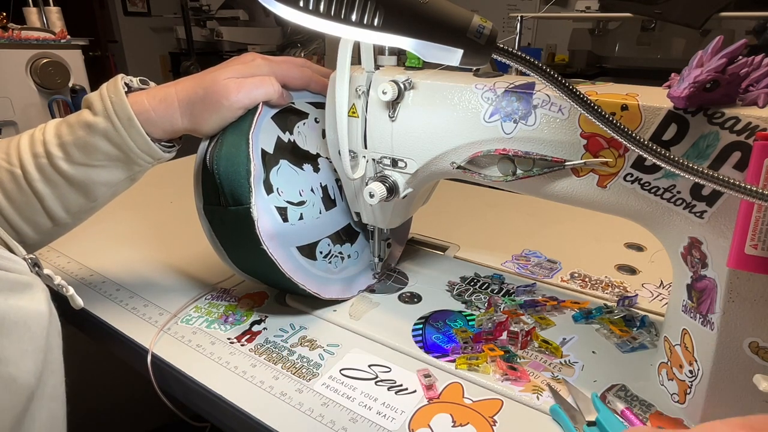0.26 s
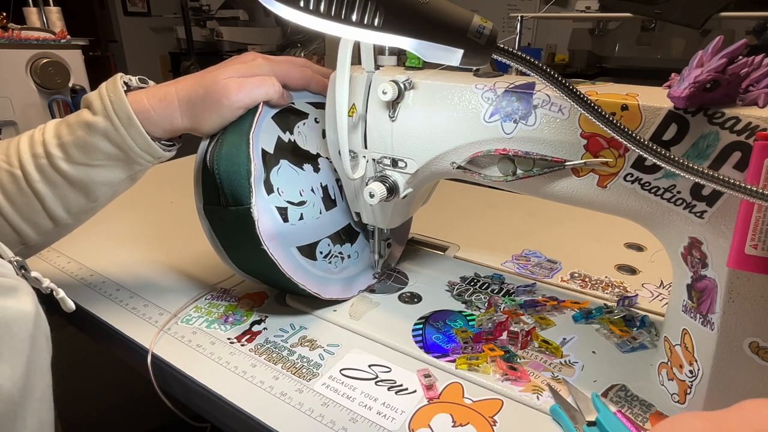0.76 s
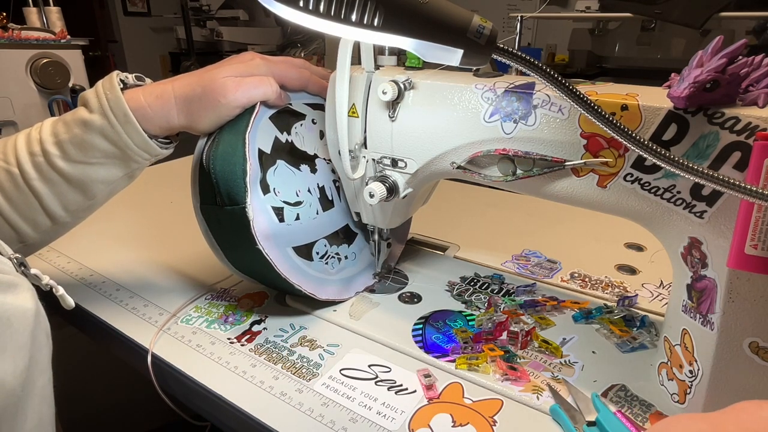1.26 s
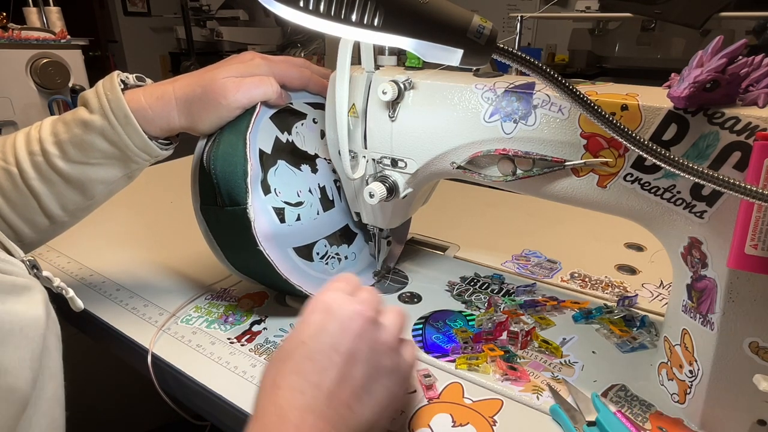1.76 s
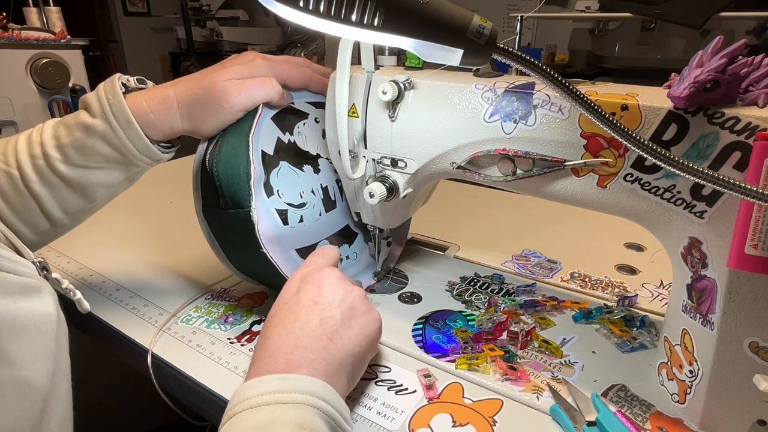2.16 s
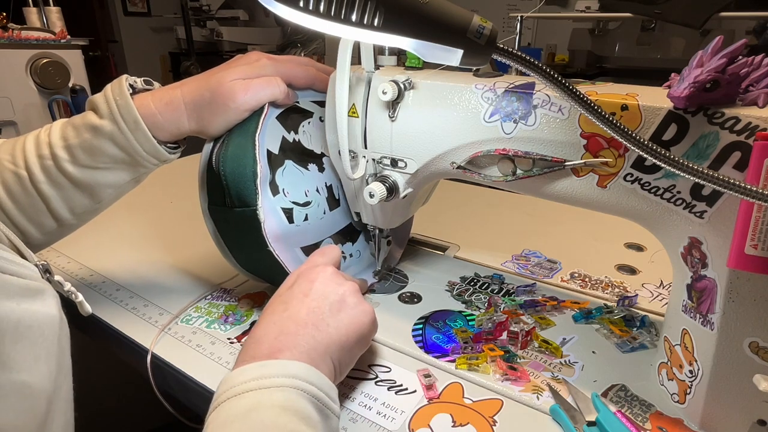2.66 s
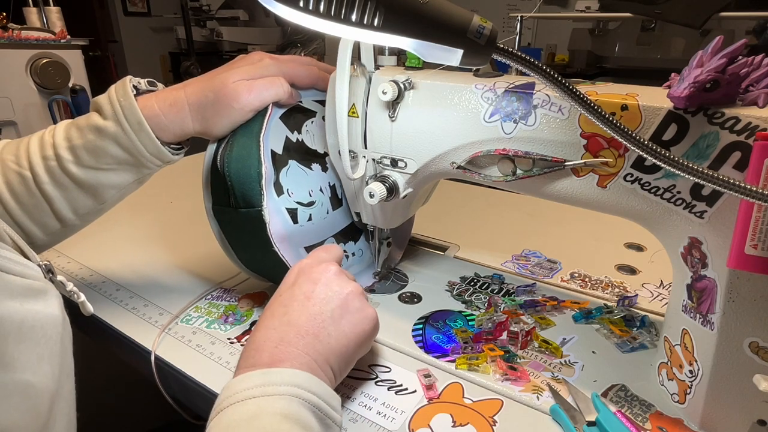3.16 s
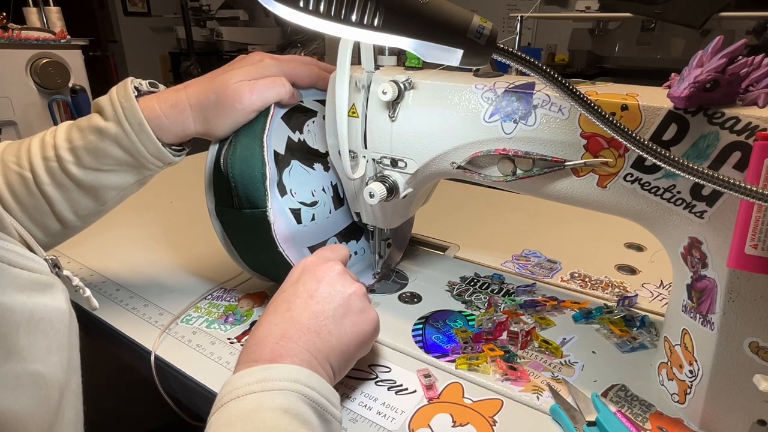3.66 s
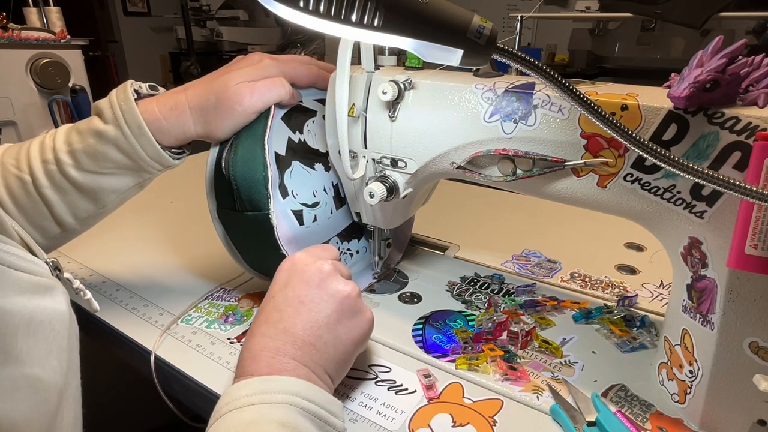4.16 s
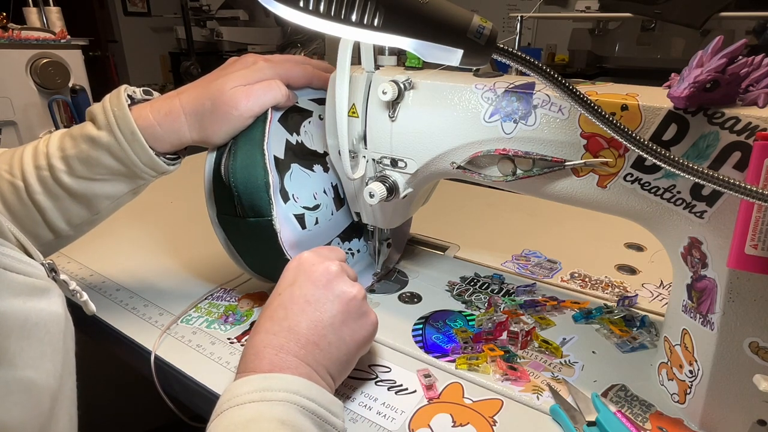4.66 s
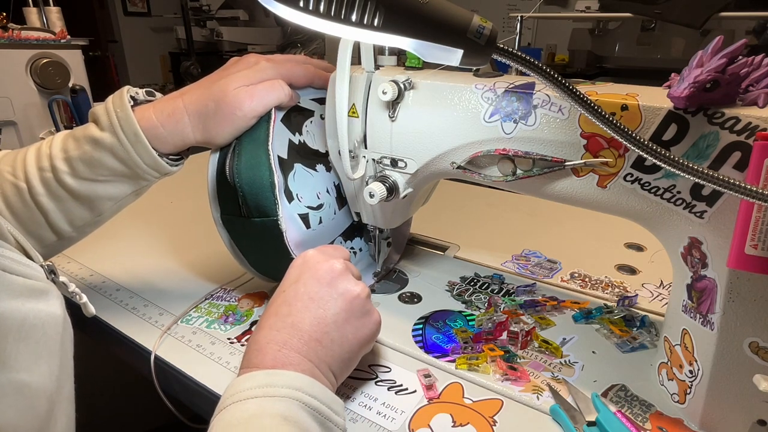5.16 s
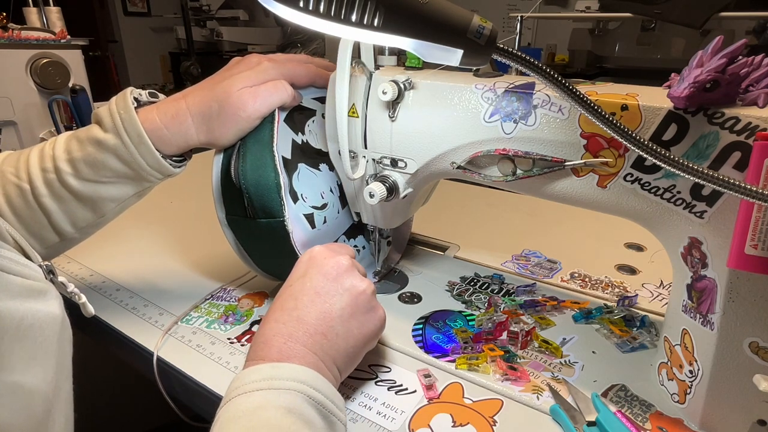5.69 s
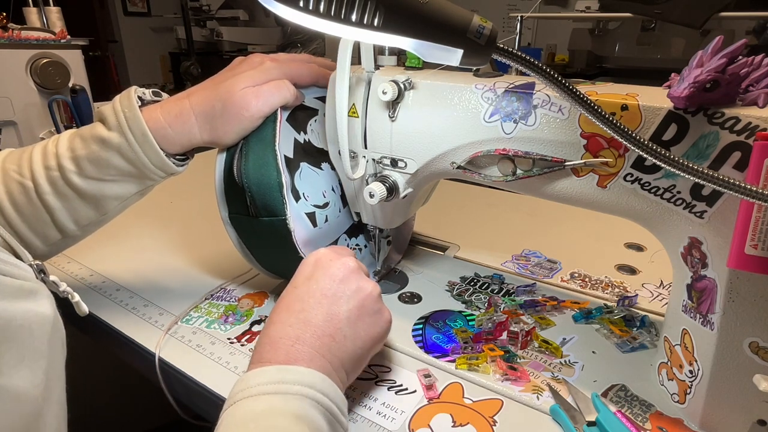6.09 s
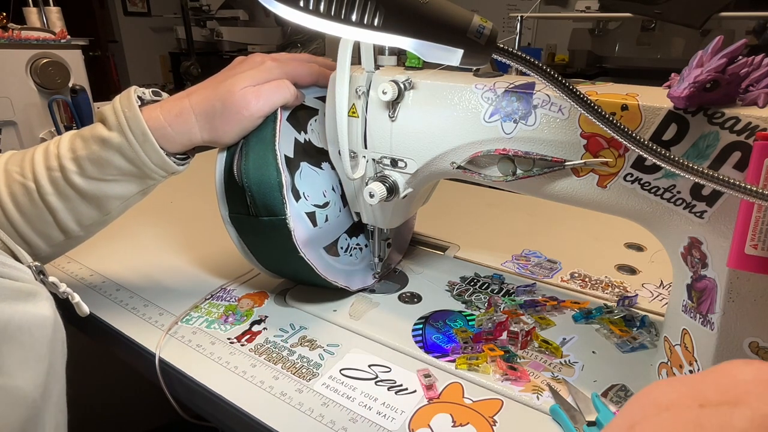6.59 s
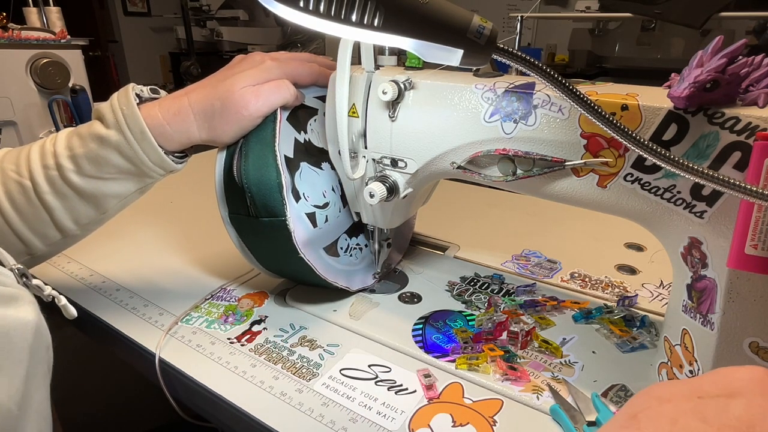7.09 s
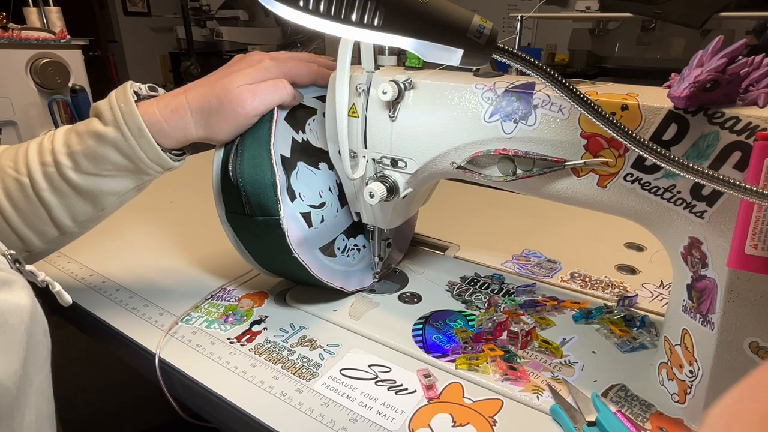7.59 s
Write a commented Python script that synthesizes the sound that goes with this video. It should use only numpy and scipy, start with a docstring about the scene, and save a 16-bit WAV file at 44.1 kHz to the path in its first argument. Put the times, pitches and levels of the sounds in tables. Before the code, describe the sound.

An industrial sewing machine works through a stiff panel, heard very near with short indoor reflections. Hard metallic clicks come first, then the gears start whirring with belt chirps. Thirteen heavy, evenly spaced needle clacks follow, with table knocks, ticking linkage and dry squeaks. The motor runs down, fabric shifts softly, the machine restarts for one stitch and ends in a sharp snap, leaving faint hiss.

```python
"""In a small workroom, close by, an industrial sewing machine stitches slowly through a stiff panel.
Levers clatter as steel clicks over a ringing bed, then gear noise, a hum and belt chirps start the motor.
A little over twice a second comes a clack, a sweeping knock, a dying rasp of thread noise and feed thuds,
with small squeaks from sliding tones. The machine stops, makes one more stitch and stops again
with a sharp snap of one bright tone; a soft hiss of coloured noise lingers."""
import sys
import numpy as np
from scipy import signal
from scipy.fft import rfft, irfft, next_fast_len
from scipy.io import wavfile
from scipy.ndimage import map_coordinates

SR = 44100
rng = np.random.default_rng(int(sys.argv[2]) if len(sys.argv) > 2 else 0)


def store_wav(level_fs):
    """Save 16-bit WAV to argv[1]."""
    pcm = np.round(np.clip(np.atleast_2d(level_fs), -1, 1) * 32767)
    wavfile.write(sys.argv[1], SR, pcm.T.astype(np.int16))


N = 345744
TIME = np.arange(N) / SR
# In all tables and settings, t60 is the time to fade by 60 dB; dB levels are before later mixing gains.


def amp(db):
    """Turn decibels into a gain."""
    return 10 ** (np.asarray(db) / 20)


def unit(x):
    """Scale to an rms (average strength) of 1."""
    return x / np.sqrt(np.mean(x ** 2) + 1e-20)


def along(points, hz):
    """Read a value between (Hz, value) points on a logarithmic pitch axis."""
    point_hz, value = np.transpose(points)
    return np.interp(np.log(hz + 1), np.log(point_hz + 1), value)


def wobble(rate):
    """Draw a smooth random curve through `rate` random points a second."""
    points = rng.standard_normal(int(N * rate / SR) + 4)
    return map_coordinates(points, [TIME * rate], order=2)


def filtered(x, response):
    """Change strength and phase at each frequency by a complex response."""
    size = next_fast_len(N + SR // 2)
    hz = np.fft.rfftfreq(size, 1 / SR)
    return irfft(rfft(x, size) * response(hz), size)[..., :N]


def noise(spectrum):
    """Make noise of rms 1 with the given colour, falling off below its lowest point."""
    low_hz = spectrum[0][0] / 2

    def colour(hz):
        return amp(along(spectrum, hz)) * hz ** 2 / (hz ** 2 + low_hz ** 2)

    return unit(filtered(rng.standard_normal(N), colour))


def resonant_noise(modes):
    """Make noise of rms 1 through resonances given as (pitch_hz, width_hz, level_db)."""
    def body(hz):
        total = 0
        for k, (pitch, width, db) in enumerate(modes):
            resonance = 1j * hz * width / (pitch * pitch - hz * hz + 1j * hz * width)
            total = total + (-1) ** k * amp(db) * resonance  # neighbours have opposite signs
        return total

    return unit(filtered(rng.standard_normal(N), body))


def add(track, s, sound):
    """Mix a sound into a track at time s."""
    start = max(round(s * SR), 0)
    track[start:start + len(sound)] += sound[:max(N - start, 0)]


def bursts(rows, attack, t60):
    """Make a loudness curve that jumps at each (start_s, level_db) row and dies away."""
    t, out = TIME[:SR], np.zeros(N)
    shape = (1 - np.exp(-t / attack)) * amp(-60 * t / t60)
    for s, db in rows:
        add(out, s, amp(db) * shape / shape.max())
    return out


def rings(rows, modes, attack, scatter_db):
    """At each (start_s, level_db) row ring the (pitch_hz, level_db, t60_s) modes at new strengths."""
    t, out = TIME[:SR], np.zeros(N)
    onset = 1 - np.exp(-(t / attack) ** 2)
    for s, db in rows:
        ring = np.zeros(len(t))
        for hz, level, t60 in modes:
            fade = amp(level + scatter_db * rng.normal() - 60 * t / t60)
            ring += fade * np.sin(2 * np.pi * (hz * t + rng.random()))
        add(out, s, amp(db) * ring * onset)
    return out


def chatter(rate, t60, spread_db):
    """Make a loudness curve of rms 1 from many tiny contacts of uneven size, `rate` a second."""
    sizes = amp(spread_db * np.minimum(rng.exponential(size=N), np.pi))
    contacts = (rng.random(N) < rate / SR) * sizes
    return unit(signal.fftconvolve(contacts, amp(-60 * TIME[:SR // 10] / t60))[:N])


def spacious(layer, angle):
    """Mix one part shared by both sides with a separate part on each; a larger angle is more diffuse."""
    return np.cos(angle) * layer() + np.sin(angle) * np.array([layer(), layer()])


# colour of a knock on the table: pitch_hz, level_db
KNOCK_COLOUR = [(60, -17), (200, -14), (340, 4.5), (480, -9.5), (900, -17), (1700, -12.5), (3000, -53),
                (8000, -52.5)]


def knocks(rows, lag, spread, knee_hz):
    """Send bending waves through the table top: treble outruns bass, so each knock sweeps downwards."""
    pushes = np.zeros(N)
    for s, db in rows:
        add(pushes, s + lag, amp([db]))

    def bending(hz):
        # the deepest bass arrives `spread` seconds late, higher pitches sooner
        turns = spread * knee_hz * np.log(1 + hz / knee_hz)
        return amp(along(KNOCK_COLOUR, hz)) * np.exp(-2j * np.pi * turns)

    return filtered(pushes, bending)


# times when the motor is driven: start_s, stop_s, level_db
MOTOR_RUNS = [(0.681, 6.258, -2.5), (6.974, 7.44, -3.5)]


def drive(t60):
    """Follow how strongly the motor turns things: quick to start, running down after each stop."""
    strength = np.zeros(N)
    for on, off, db in MOTOR_RUNS:
        rise = np.clip((TIME - on) / 0.0065, 0, 1)
        strength += amp(db) * rise * amp(-60 * np.maximum(TIME - off, 0) / t60)
    return strength


# needle strokes: start_s, thread_rasp_db, knock_db, knock_delay_s, following_feed_weight_db
STITCHES = [(0.864, -40, -36.5, 0.035, -4), (1.277, -49.5, -35, 0.046, 2.5),
            (1.7031, -41.5, -36.5, 0.012, 3.5), (2.1291, -41.5, -33.5, 0.015, 0.5),
            (2.5631, -45, -47, 0.011, -0.5), (2.9909, -50, -31.5, .012, 0.5),
            (3.4241, -48, -34, 0.0091, 2.5), (3.8527, -45.5, -35.5, 0.014, 3),
            (4.2772, -44, -44, 0.0095, 0), (4.708, -47.5, -34.5, 0.011, 0), (5.139, -46, -35.5, 0.012, 1),
            (5.5658, -44, -32, 0.0098, 2), (5.9986, -47, -46.5, 0.011, 3),
            (7.1554, -41.5, -39.5, 0.052, -2.5)]
CYCLE_SCATTER_DB, CYCLE_SCATTER_S = 1.5, 0.002  # random differences between stitches


def each_stitch(cycle, weighted=False):
    """Repeat (delay_s, level_db) contacts at every stroke while driven; weighted adds the feed's weight."""
    rows = []
    for stroke, *_, feed_db in STITCHES:
        for delay, db in cycle:
            s = stroke + delay + CYCLE_SCATTER_S * rng.normal()
            level = db + weighted * feed_db + CYCLE_SCATTER_DB * rng.normal()
            if any(on < s < off for on, off, _ in MOTOR_RUNS):
                rows.append((s, level))
    return rows


# colour of the quiet room: pitch_hz, level_db (per Hz)
QUIET_COLOUR = [(18, -30), (30, 0), (102, 0), (597, -18), (1520, -13), (5580, -32), (8040, -37),
                (9390, -49), (15000, -34)]
# colour of the lingering hiss: pitch_hz, level_db (per Hz)
HISS_COLOUR = [(200, 2), (500, -10), (1000, -10.5), (2000, -3.5), (3000, -9), (5000, -10), (8000, -12.5),
               (12000, -26.5), (15000, -25)]
# loudness of the lingering hiss: time_s, level_db
HISS_LEVEL = [(7.46, -100), (7.52, -50.5), (7.65, -50.5), (7.84, -51)]


def air():
    """Soft coloured noise fills the quiet room, with a hiss after the last stop."""
    hiss = amp(np.interp(TIME, *np.transpose(HISS_LEVEL)))
    still = amp(-73) * spacious(lambda: noise(QUIET_COLOUR), angle=.4)
    return still + hiss * spacious(lambda: noise(HISS_COLOUR), angle=.6)


# hard clicks of levers and presser foot: start_s, click_db, blow_to_bed_db
LEVER_CLICKS = [(0.0272, -17, -51.5), (0.0389, -15, -42), (0.0945, -12.5, -28.5), (0.119, -27.5, -38.5),
                (0.1361, -21.5, -38.5), (0.147, -36, -43.5), (0.169, -37.5, -45.5), (0.259, -46, -80.5),
                (0.282, -37, -68), (0.387, -41.5, -60.5), (0.5411, -31.5, -63), (6.706, -34, -60.5),
                (6.9768, -49.5, -42), (7.4112, -32.5, -66), (7.4847, -21, -45.5)]
# ringing modes of the machine bed: pitch_hz, level_db, t60_s
BED_MODES = [(256.5, -10.5, 0.4), (371, -8.5, .13), (436, 0, .13), (476, -3, 0.13), (551, 0, 0.11),
             (631, -5, 0.13), (885, -7, .11), (1204, -13, .12), (1790, -10.5, .08), (2220, -10, 0.071)]
# ringing modes of the table: pitch_hz, level_db, t60_s
TABLE_MODES = [(48.5, 4.5, 0.54), (78.2, 0, 0.66), (62.9, -7.5, 0.5), (41.5, -12.5, .5), (119, -5.5, 0.35),
               (165.5, -7, .25)]
# colour of steel on steel: pitch_hz, level_db (per Hz)
STEEL_COLOUR = [(150, -14.5), (400, -7), (1100, -7.5), (1900, 0.5), (2900, -10.5), (4600, 1), (5600, 0),
                (6800, -2.5), (8500, 0), (12000, -9.5), (15000, -17)]
# colour of loose parts on the bed: pitch_hz, level_db (per Hz)
LOOSE_COLOUR = [(150, 1.5), (450, 4.5), (900, 0), (1900, -5), (2800, -14), (6000, -15.5), (9000, -31),
                (15000, -34.5)]
# the catch's lever lands on its stop: start_s, thud_db, jolt_to_table_db
LANDINGS = [(0.602, -35.5, -50), (1.5168, -31.5, -44.5), (6.778, -39, -51.5), (7.486, -33.5, -40)]
BED_LAG_S = 0.00087  # the bed answers just after the click
BED_RINGING_DB = -36.5  # loose parts are already rattling at the outset
# starts and stops rock the table a moment later
START_JOLT_DB, STOP_JOLT_DB, JOLT_LAG_S = -47.5, -47.5, 0.0266


def levers():
    """Steel clicks knock and ring the bed and rattle its loose parts; starts, stops, landings rock the table."""
    hits = [(s, db) for s, db, _ in LEVER_CLICKS]
    blows = [(s + BED_LAG_S, db) for s, _, db in LEVER_CLICKS]
    jolts = [(s, db) for s, _, db in LANDINGS]
    for on, off, _ in MOTOR_RUNS:
        jolts += [(on + JOLT_LAG_S, START_JOLT_DB), (off + JOLT_LAG_S, STOP_JOLT_DB)]
    contact = amp(-6.0) * bursts(hits, attack=.0004, t60=.022)
    afterglow = amp(-38.0) * bursts(hits, attack=0.0064, t60=0.22)
    clicks = (contact + afterglow) * noise(STEEL_COLOUR)
    bed = rings(blows, BED_MODES, attack=0.005, scatter_db=2.5)
    shaking = bursts([(0, BED_RINGING_DB)] + blows, attack=0.003, t60=0.16)
    rattle = amp(-4.5) * shaking * chatter(rate=210, t60=0.034, spread_db=2.5) * noise(LOOSE_COLOUR)
    body = amp(32.5) * knocks(blows, lag=0.001, spread=0.01386, knee_hz=600)
    rocking = rings(jolts, TABLE_MODES, attack=0.026, scatter_db=2.5)
    return clicks + bed + body + rattle + rocking


# the panel is shifted by hand while the machine rests:
# loudest_s, length_of_rise_and_of_fall_s, rustle_db, low_rubbing_db
HANDLING = [(0.455, 0.34, -71, -76), (0.543, 0.052, -71, -51.5), (6.408, 0.13, -84.5, -63),
            (6.535, 0.065, -69.5, -82), (6.631, 0.075, -67, -81.5), (6.703, 0.054, -66.5, -61.5),
            (6.888, 0.28, -68, -64)]
# colour of the rustle: pitch_hz, level_db (per Hz)
RUSTLE_COLOUR = [(500, -8), (1000, 1.5), (1600, 2), (3000, -5), (6000, -22), (12000, -32)]
# colour of the low rubbing: pitch_hz, level_db (per Hz)
RUBBING_COLOUR = [(90, -4.5), (240, 2), (450, -9), (900, -27.5), (4000, -48)]
# knocks on the table: from the panel as it is guided, and near 1.05-1.44 s further feed knocks; start_s,
# level_db
TABLE_KNOCKS = [(1.052, -42), (1.252, -41), (1.44, -43), (1.99, -37), (2.474, -38), (4.488, -40.5),
                (5.945, -39.5), (6.083, -34.5)]


def panel():
    """The table knocks, mostly from the stiff panel and now and then from the feed; the panel rustles and rubs
    in soft swells of noise when shifted."""
    rustle, rubbing = np.zeros(N), np.zeros(N)
    for s, length, rustle_db, rubbing_db in HANDLING:
        swell = np.cos(np.pi * np.clip((TIME - s) / (2 * length), -.5, .5)) ** 4
        rustle += amp(rustle_db) * swell
        rubbing += amp(rubbing_db) * swell
    shifting = rustle * spacious(lambda: noise(RUSTLE_COLOUR), angle=1.0) + rubbing * noise(RUBBING_COLOUR)
    return shifting + amp(41.5) * knocks(TABLE_KNOCKS, lag=0.0024, spread=0.012, knee_hz=505)


# the catch snaps over and rebounds, one row for each contact: start_s, level_db, pitch_hz
SNAPS = [(0.591, -16.5, 2820), (0.595, -25.5, 2876), (1.506, -20, 2980), (1.5137, -35.5, 3170),
         (1.5192, -37, 3020), (1.5297, -37, 3010), (6.7654, -20, 2966), (7.4763, -11.5, 3010),
         (7.479, -28, 3160), (7.4994, -18.5, 3050), (7.5161, -24, 3070), (7.5273, -38, 3050)]
# colour of its crack, also used for the needle's press: pitch_hz, level_db (per Hz)
CRACK_COLOUR = [(200, 0.5), (500, 3), (1100, -4.5), (1900, 3.5), (3000, -1), (4500, 2), (6300, 1.5),
                (7200, 4.5), (8500, 1.5), (12000, -21.5), (15000, -32)]


def catch(rise=0.0016, t60=0.008):
    """A small stiff part snaps: a crack, a few cycles of one bright mode, a knock and its lever's thud."""
    t, chirps = TIME[:SR // 20], np.zeros(N)
    shape = (1 - np.exp(-(t / rise) ** 3)) * amp(-60 * t / t60)
    for s, db, hz in SNAPS:
        add(chirps, s, amp(db + 4) * shape / shape.max() * np.sin(2 * np.pi * hz * t))
    blows = [(s, db) for s, db, _ in SNAPS]
    crack = amp(-13) * bursts(blows, attack=0.00024, t60=0.016) * noise(CRACK_COLOUR)
    shiver = amp(-37) * bursts(blows, attack=0.0033, t60=0.17) * noise(CRACK_COLOUR)
    landings = [(s, db) for s, db, _ in LANDINGS]
    lever_modes = [(332, 0.5, 0.068), (238.6, -6.5, 0.11), (432, -11, 0.17), (171, -25.5, 0.3)]
    thud = rings(landings, lever_modes, attack=0.0034, scatter_db=2.5)
    body_noise = resonant_noise([(1520, 890, -5.5), (2450, 480, 3.5)])
    body = amp(-24.0) * bursts(blows, attack=0.00094, t60=0.023) * body_noise
    knock = amp(21) * knocks(blows, lag=0.0011, spread=0.02, knee_hz=471)
    return chirps + crack + body + shiver + thud + knock


# belt and pulley chirps: point_of_turn (0 to 1), pitch_hz, level_db
BELT_CHIRPS = [(.22, 1450, -60), (.31, 3760, -48), (.5, 1715, -55.5), (.5, 4810, -62)]
CHIRP_STRAY = .016  # how far a chirp's pitch strays (share of the pitch)
TURN_TICK_AT, TURN_TICK_DB = .3, -58.5  # point of the turn (0 to 1), level


def belt(turns):
    """At fixed points of every turn the belt and pulley chirp with straying pitch, and the belt ticks."""
    chirps = np.zeros(N)
    for point, hz, db in BELT_CHIRPS:
        pulse = ((1 + np.cos(2 * np.pi * (turns - point))) / 2) ** 7 * amp(2.7 * wobble(40))
        pitch_hz = hz * (1 + CHIRP_STRAY * wobble(70))
        tone = np.sin(2 * np.pi * np.cumsum(pitch_hz) / SR)
        chirps += amp(db) * pulse * (tone + .4 * resonant_noise([(hz, hz / 9, 0)]))
    since_tick = (turns - TURN_TICK_AT) % 1
    tick = unit(np.exp(-2 * np.pi * since_tick) * amp(3 * wobble(40)))
    tick_noise = resonant_noise([(720, 370, 0.0), (1645, 350, -6.5), (4120, 370, -6.5)])
    return chirps + amp(TURN_TICK_DB) * tick * tick_noise


# speed of the motor: time_s, turns_per_s
MOTOR_SPEED = [(.68, 39.35), (1.5, 39.4), (2.5, 39.1), (3.4, 39.12), (4.1, 39.65), (5, 39.22),
               (6.25, 39.15), (6.6, 37.6), (7, 39.5), (7.4, 39.8)]
# colour of the gear rumble: pitch_hz, level_db (per Hz)
GEAR_COLOUR = [(30, -9.5), (110, -2.5), (220, 8.5), (420, 4), (680, 3.5), (1100, -6), (1650, -11),
               (2600, -21), (3300, -5.5), (4400, -14), (6000, -23), (9000, -24.5), (15000, -41)]
# resonances of the casting, stirred by the running gear: pitch_hz, width_hz, level_db
CASTING_MODES = [(257, 55, 0), (383, 53, -3), (420.4, 37, 0), (590, 33, 4.5), (803.7, 27, 4)]
# colour of loose play: pitch_hz, level_db (per Hz)
PLAY_COLOUR = [(300, -4), (800, -2), (1600, 0.5), (2550, 3.5), (3500, 1), (4800, 4.5), (7000, -11.5),
               (14000, -23)]
GEAR_DB, CASTING_DB, PLAY_DB, HUM_DB, DRONE_DB = -50.5, -52, -57.5, -55.5, -57
HUM_RUNDOWN_S = 0.97  # t60: the hum outlasts the gears


def motor():
    """Gears rumble, loose parts play, a hum wavers at twice the turning rate, and the belt ticks fast."""
    turns = np.cumsum(np.interp(TIME, *np.transpose(MOTOR_SPEED))) / SR
    # every stitch briefly makes the gears louder
    load = 1 + 0.076 * bursts([(s, 0) for s, *_ in STITCHES], attack=0.011, t60=0.14)
    gear = amp(GEAR_DB) * spacious(lambda: noise(GEAR_COLOUR), angle=0.21) * amp(1.4 * wobble(90))
    casting = amp(CASTING_DB) * spacious(lambda: resonant_noise(CASTING_MODES), angle=0.29)
    loose = chatter(rate=90, t60=.016, spread_db=3.2)
    play = amp(PLAY_DB) * loose * noise(PLAY_COLOUR)
    waver = np.abs(1 + .4 * wobble(9))
    hum = amp(HUM_DB) * waver * np.sin(4 * np.pi * turns + 0.8 * wobble(11))
    drone = amp(DRONE_DB) * resonant_noise([(79.2, 10.2, 9.0), (49.0, 7.4, -3.0)])
    running = drive(t60=0.28) * (load * gear + play + belt(turns))
    return running + drive(t60=0.19) * load * casting + drive(t60=HUM_RUNDOWN_S) * (hum + drone)


# feed thuds in every stitch: after_stroke_s, level_db
FEED_CYCLE = [(-.015, -41.5), (.186, -42.5), (.215, -38.5)]
# ticks of linkage and thread in every stitch: after_stroke_s, level_db
TICK_CYCLE = [(.031, -39.5), (.079, -36.5), (.108, -39), (.135, -45.5), (.209, -39.5), (.254, -39.5),
              (.365, -46)]
# loose links and thread clack between strokes: start_s, level_db
LOOSE_CLACKS = [(1.564, -37), (1.575, -40), (1.588, -44), (1.599, -43), (2.327, -37), (2.851, -32.5),
                (3.5984, -40), (3.6386, -43), (4.0547, -47), (4.5575, -33.5), (4.9192, -47), (6.0876, -50),
                (7.361, -40)]
# squeaks of a dry steel joint that slips now and then: start_s, level_db
SQUEAKS = [(0.7028, -43), (0.9697, -43.5), (1.4381, -42.5), (1.8173, -38.5), (2.2374, -41.5), (2.6015, -43),
           (2.6628, -46), (3.2094, -41), (3.5818, -40), (3.6411, -41), (4.4104, -41.5), (4.8464, -43.5),
           (5.2759, -45.5), (5.7848, -41.5), (6.2272, -40), (6.993, -41.5), (7.2544, -44.5), (7.27, -42.5),
           (7.4574, -41.5)]
# modes with which the feed thuds: pitch_hz, level_db, t60_s
FEED_MODES = [(255.2, 0, .11), (324.6, -4.5, 0.079), (411, -6.5, 0.078), (196.5, -10, 0.11)]
# colour of the feed's thud: pitch_hz, level_db (per Hz)
THUD_COLOUR = [(50, -16), (150, -4.5), (260, 8.5), (420, -9), (800, -10), (2500, -24.5), (8000, -67)]
# colour of ticks and the needle's clack: pitch_hz, level_db (per Hz)
CLACK_COLOUR = [(200, -3), (600, -5), (1100, -1), (1700, 1.5), (2600, 1), (3400, -2.5), (4500, 3.5),
                (6500, -4.5), (8200, 0.5), (11000, -8), (15000, -16)]
# colour of the feed's rattle and the thread's rasp: pitch_hz, level_db (per Hz)
THREAD_COLOUR = [(200, -8.5), (600, 0), (1200, -14), (2000, 5), (2400, -12), (2900, -8.5), (3250, 7.5),
                 (4000, -9), (5000, -3.5), (7000, -0.5), (10000, -8), (15000, -11)]
START_TICK_DB, START_THUD_DB = -37.5, -35.5  # the drive takes hold with a tick and a thud
SCRAPE_DB, SCRAPE_LEAD_S = 8.5, 0.0026  # a scrape at each listed slip: above the squeak's level, before it
TICK_T60_S = .045


def linkage():
    """The feed thuds and rattles and small parts tick: in every stitch, at starts and when the joint slips."""
    heavy = each_stitch(FEED_CYCLE, weighted=True)
    heavy += [(on + 0.0046, START_THUD_DB) for on, _, _ in MOTOR_RUNS]
    light = each_stitch(TICK_CYCLE) + LOOSE_CLACKS
    light += [(on, START_TICK_DB) for on, _, _ in MOTOR_RUNS]
    light += [(s - SCRAPE_LEAD_S, db + SCRAPE_DB) for s, db in SQUEAKS]
    thuds = amp(-4.0) * rings(heavy, FEED_MODES, attack=.003, scatter_db=3)
    thuds += amp(-10) * bursts(heavy, attack=0.0019, t60=0.18) * noise(THUD_COLOUR)
    ticks = amp(-7.0) * bursts(light, attack=0.00013, t60=TICK_T60_S) * noise(CLACK_COLOUR)
    shaking = amp(-17.0) * bursts(heavy, attack=0.0076, t60=0.43)
    rattle = shaking * chatter(rate=320, t60=0.02, spread_db=6.5) * noise(THREAD_COLOUR)
    return thuds + ticks + rattle * drive(t60=0.39)


# tones of the squeaking joint, before they stray: pitch_hz, level_db
JOINT_TONES = [(2020, 0), (8130, -7), (13150, -14)]
# the joint also sings faintly in every stitch: after_stroke_s, level_db
SQUEAK_CYCLE = [(.003, -48), (.033, -58), (.136, -57.5), (.256, -55.5)]
SQUEAK_DB = .4  # added to every squeak


def squeaks(lead=0.0044):
    """A dry joint sings for a moment each time it slips, rough in pitch and level."""
    length = .025  # seconds
    t, envelope = TIME[:round(length * SR)], np.zeros(N)
    swell = np.sin(np.pi * (t / length) ** .75) ** 2
    for s, db in SQUEAKS + each_stitch(SQUEAK_CYCLE):
        add(envelope, s - lead, amp(db + SQUEAK_DB) * swell)
    # uneven travel makes all tones stray in pitch together
    travel = np.cumsum(1 + .005 * wobble(12) + .009 * wobble(300)) / SR
    tone = sum(amp(level) * np.sin(2 * np.pi * hz * travel) for hz, level in JOINT_TONES)
    return envelope * tone * amp(1.5 * wobble(250))


# the needle bar chatters just after each stroke: after_stroke_s (before random scatter), db_under_punch
AFTERSHOCKS = [(.006, 11.5), (0.013, 19.5)]
PUNCH_DB = -21.5  # level of every needle stroke, before the gain of each layer
AFTERSHOCK_SCATTER_DB = -1.5  # each aftershock differs in strength


def needle():
    """The needle punches through, the table knocks and rumbles, and the thread's rasp dies away."""
    blows = [(s, PUNCH_DB) for s, *_ in STITCHES]
    pulls = [(s, db) for s, db, *_ in STITCHES]
    shoves = [(s + delay, db) for s, _, db, delay, _ in STITCHES]
    contacts = list(blows)
    for s, db in blows:
        for delay, loss in AFTERSHOCKS:
            level = db - loss + AFTERSHOCK_SCATTER_DB * rng.normal()
            contacts.append((s + delay * rng.uniform(0.62, 1.4), level))
    punch = amp(-9.5) * bursts(contacts, attack=0.0013, t60=0.014)
    punch_tail = amp(-22) * bursts(blows, attack=0.0022, t60=0.095)
    clack = (punch + punch_tail) * noise(CLACK_COLOUR)
    knock = amp(43) * knocks(shoves, lag=0, spread=.018, knee_hz=496)
    late_shoves = [(s + 0.004, db) for s, db in shoves]
    rumble = amp(-10.5) * bursts(late_shoves, attack=0.007, t60=0.23) * resonant_noise([(360, 110, 0)])
    slips = chatter(rate=170, t60=.02, spread_db=4)
    pulling = amp(-3.5) * bursts(pulls, attack=0.0085, t60=0.8)
    rasp = pulling * noise(THREAD_COLOUR) * (0.43 + 0.72 * slips)
    bright_modes = [(12950, 270, 14.5), (14800, 1800, -5.5), (4950, 310, 5.5), (7860, 200, 8.0)]
    zing = bursts(pulls, attack=0.0011, t60=0.14) * resonant_noise(bright_modes)
    # the point presses on the panel just before it breaks through
    early_blows = [(s - .012, db) for s, db in blows]
    press = amp(-29.0) * bursts(early_blows, attack=0.0067, t60=0.103) * noise(CRACK_COLOUR)
    return press + clack + knock + rumble + rasp + zing


# how long the room rings: pitch_hz, t60_s
ROOM_DECAY = [(100, 0.57), (500, 0.292), (3000, 0.14), (12000, 0.099)]
# the room's share of the sound: pitch_hz, level_db
ROOM_SHARE = [(80, -33), (300, -8.5), (900, -4), (2500, 5.5), (5000, -3), (13000, -41.5)]


def room(x):
    """Dense reflections from the table and machine arm, then a short tail, different at each port."""
    hz, t, grains = signal.stft(rng.standard_normal((2, SR // 2)), SR, nperseg=256)
    decay = amp(-60 * t / along(ROOM_DECAY, hz)[:, None])
    decay = decay + 3 * amp(-60 * t / 0.0045)  # the dense early reflections
    decay /= np.sqrt(np.mean(decay ** 2, axis=1, keepdims=True) * (SR // 2))
    shaped = grains * decay * amp(along(ROOM_SHARE, hz))[:, None]
    tail = signal.istft(shaped, SR, nperseg=256)[1]
    return signal.fftconvolve(np.atleast_2d(x), tail, axes=1)[:, :N]


# sent to the room, in the order motor, linkage, squeaks, needle, levers, catch: level_db
ROOM_SENDS = [1.5, -2.5, -3, -3, 1, -10.5]


def scene():
    """The machine is almost level left and right, the catch a little louder left; parts have own reflections."""
    parts, snaps = [motor(), linkage(), squeaks(), needle(), levers()], catch()
    direct = (sum(parts) + panel()) * amp([[-.5], [.5]]) + snaps * amp([[.8], [-.8]])
    reflections = sum(amp(db) * room(part) for part, db in zip(parts + [snaps], ROOM_SENDS))
    return direct + reflections + air()


# phase between the two microphone ports: pitch_hz, left_lead_radians
PORT_PHASE = [(250, 0.1), (450, 0.5), (750, 1.4), (1100, 0.9), (2000, -0.6), (2500, -3.3), (3600, -6.4),
              (4600, -6.8), (6200, -7.4), (9400, -9.4), (10500, -9.5), (13800, -12.4)]
LOW_CUT_HZ, TOP_HZ = 36, 15900


def record(dry):
    """The two ports differ in phase; the deepest bass and all above the band limit are cut."""
    def ports(hz):
        low = (hz / LOW_CUT_HZ) ** 4 / np.sqrt(1 + (hz / LOW_CUT_HZ) ** 8)
        sides = np.array([[.5j], [-.5j]])  # half of the phase on each side
        return np.exp(sides * along(PORT_PHASE, hz)) * low * (hz < TOP_HZ)

    return filtered(dry, ports)


dry = scene()
out = record(dry)
store_wav(out)
```